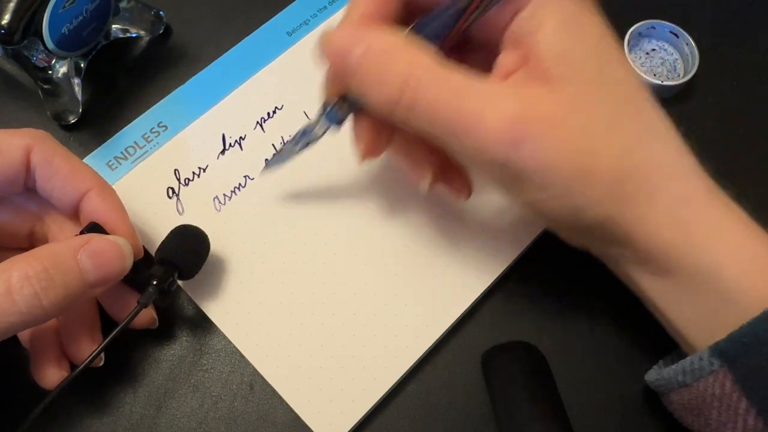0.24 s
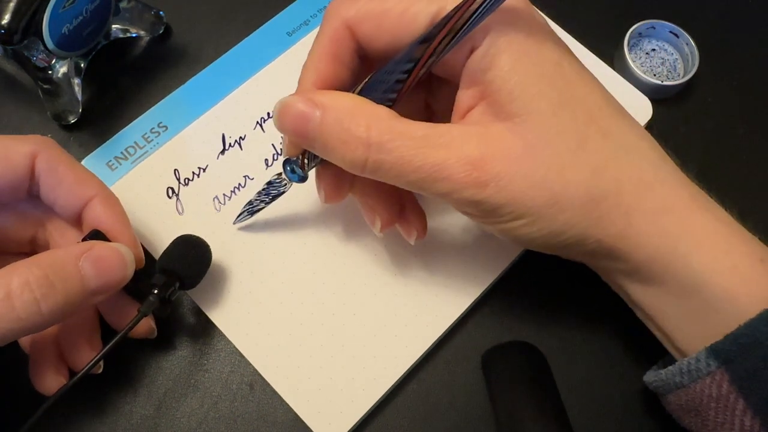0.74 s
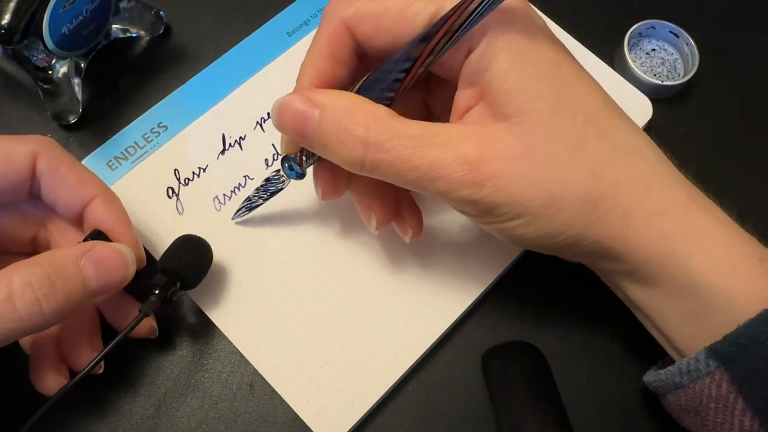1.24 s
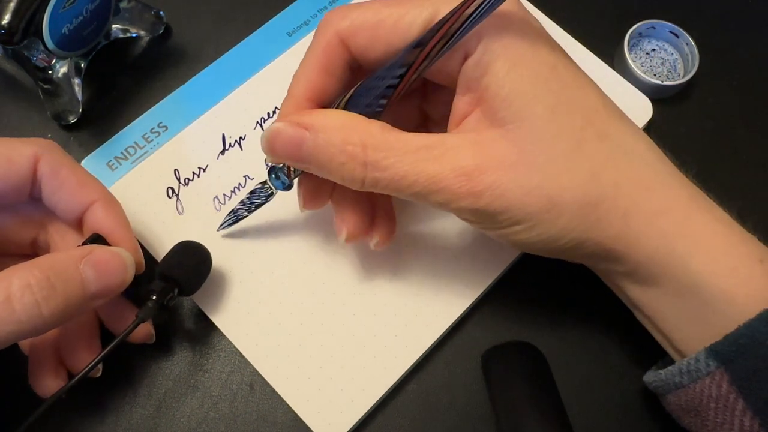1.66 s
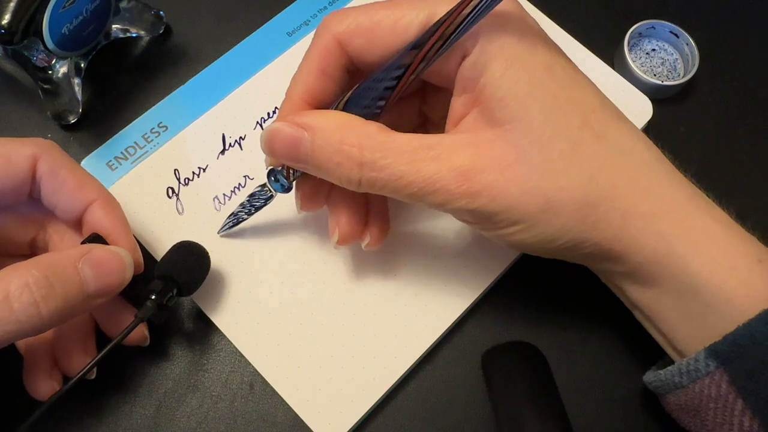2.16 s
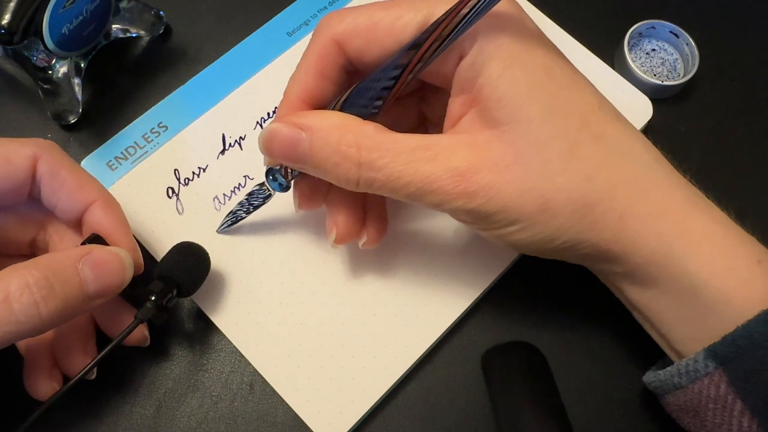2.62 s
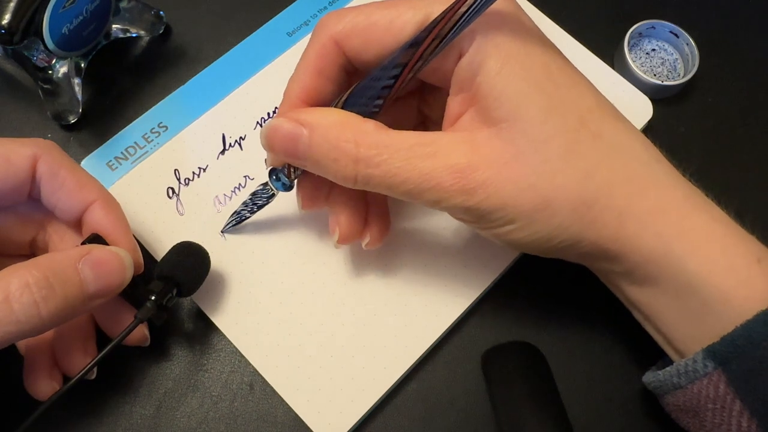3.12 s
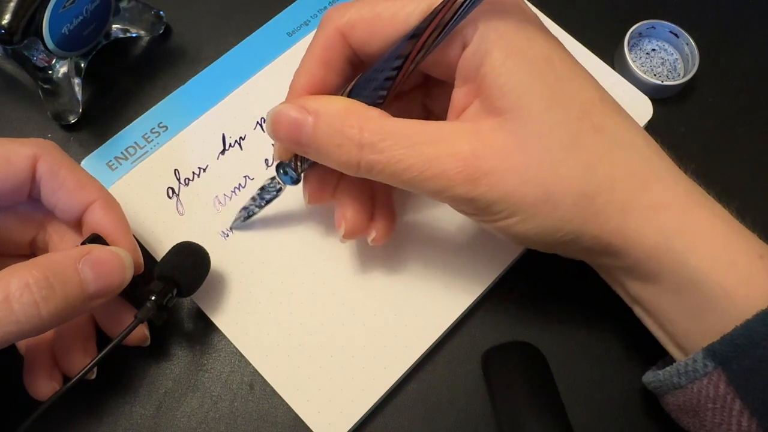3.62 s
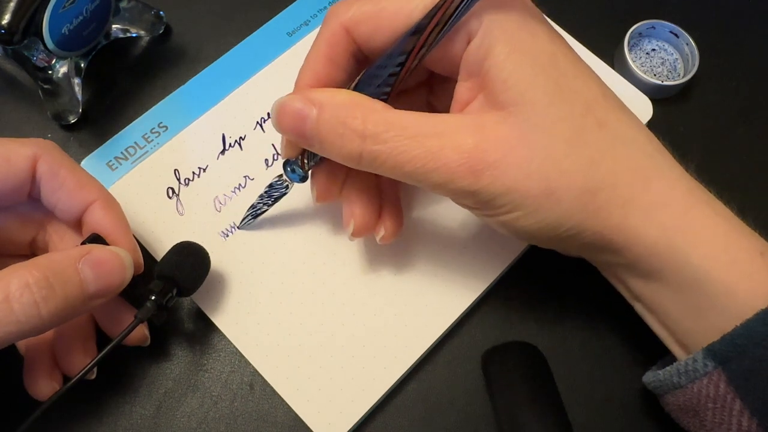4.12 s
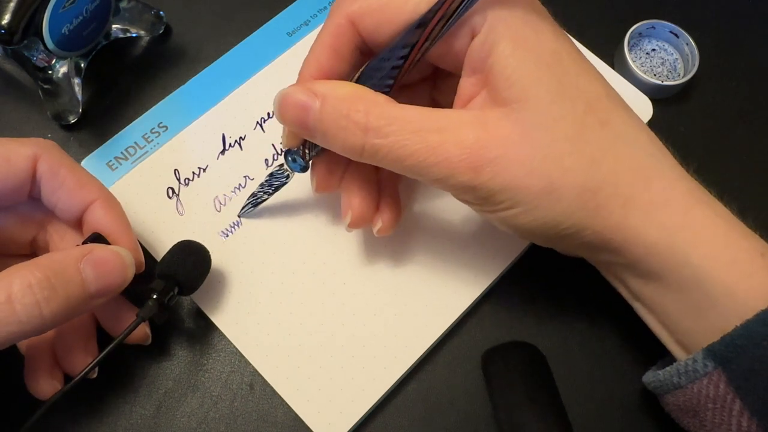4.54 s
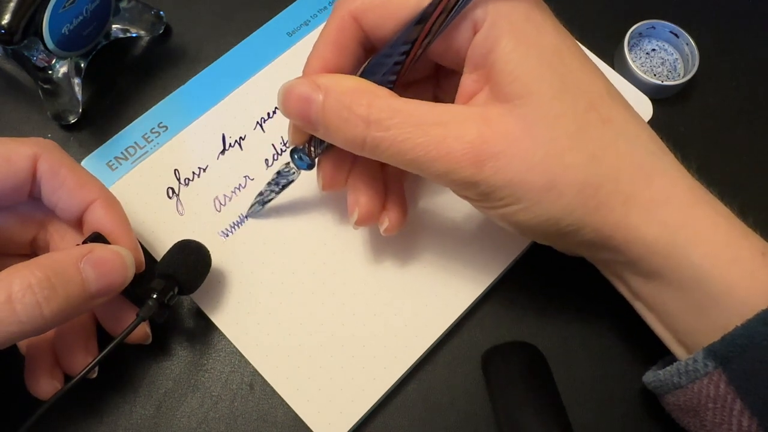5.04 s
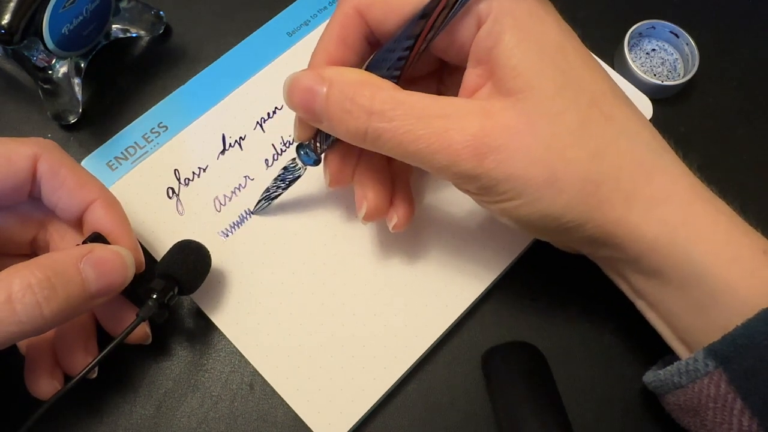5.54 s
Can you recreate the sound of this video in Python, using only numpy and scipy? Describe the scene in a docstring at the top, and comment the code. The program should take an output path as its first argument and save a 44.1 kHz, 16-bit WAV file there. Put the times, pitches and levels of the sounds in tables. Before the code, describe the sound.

Very close, dry sound from a small hand-held microphone in a quiet room with faint low ventilation hum. A tick and brief skin-on-paper hiss come first, with low bumps from shifting fingers. After a near-still pause and more bumps, a crisp tap leads into rapid alternating strokes of a glass nib, thin and scratchy with a bright ringing edge, lasting to the end.

```python
"""A glass pen scribbles quick back-and-forth strokes on a paper pad beside a small hand-held microphone.
The nib trips over paper fibres: these random snags ring the glass and its tip, and rasp the sheet and pad.
Before that, the writing hand slides over the sheet as shaped noise, and small filtered ticks are heard.
The microphone wobbles in the fingers as low noise, a wandering tone and pointed jolts.
Below lies a quiet room: coloured air noise and the narrow resonances of humming ventilation."""
import sys
import numpy as np
from scipy import signal
from scipy.fft import rfft, irfft
from scipy.io import wavfile
from scipy.ndimage import uniform_filter1d

SR = 44100
rng = np.random.default_rng(int(sys.argv[2]) if len(sys.argv) > 2 else 0)


def linear_from_db(decibels):
    """Turn decibels (scalar or array-like) into linear amplitude factors; 0 gives 1."""
    return 10 ** (np.asarray(decibels, float) / 20)


def bounce(signal):
    """Save signal as a 16-bit WAV file at the path given by the first command-line argument."""
    frames = np.transpose(np.atleast_2d(signal))
    limited = np.clip(frames, -1, 1)
    pcm = np.round(limited * 32767).astype(np.int16)
    wavfile.write(sys.argv[1], SR, pcm)


N = 254898

# Air noise of the room. Each row: frequency in Hz, relative level in dB per Hz.
AIR_SPECTRUM = [(50, -38), (85, -8), (130, 1.5), (160, -11.5), (190, -7), (320, -17), (700, -36),
                (900, -27), (1080, -29.5), (1600, -34.5), (2400, -37), (3200, -42), (6000, -44),
                (16000, -49.5)]
# Pitches of the ventilation duct. Each entry: frequency in Hz.
DUCT_PITCHES = [133, 405, 540, 608, 739, 803, 850, 1166, 1345]
# Duct resonances, in the order of the pitches. Each row: width in Hz, relative level in dB.
DUCT_MODES = [(25.2, 2.5), (28, 1.5), (29.9, 0.5), (29.5, 0), (24.6, -1.5), (18, 1), (35.4, -4.5),
              (30, -17), (45.3, -16)]
# Microphone wobbling in the fingers. Each row: time in seconds, gain of the sway in dB,
# gain of the shake in dB.
WOBBLE_PATH = [(0.0, -37, -39.5), (0.24, -22.5, -44.5), (0.36, -43.5, -45), (0.46, -23.5, -30.5),
               (0.7, -31, -46.5), (1.4, -40.5, -41), (1.62, -24, -32), (1.78, -21.5, -34),
               (1.92, -25.5, -45), (2.4, -36, -38.5), (3.4, -39, -38.5), (4.2, -33, -43.5),
               (5.09, -30.5, -41.5), (5.25, -41, -43), (5.78, -35.5, -39)]
# Jolts as the fingers shift on the microphone, before they are rounded off.
# Each row: time in seconds, peak in dB, rising and fading time constant in ms.
FINGER_JOLTS = [(0.229, -20.5, 1.5), (0.404, -28, 2.9), (0.468, -24.5, 2.3), (0.491, -23.5, 2.2),
                (0.503, -30, 2.1), (0.548, -23.5, 3.1), (1.516, -39, 2.3), (1.595, -22.5, 1.2),
                (1.622, -24.5, 1.6), (1.636, -42, 3.4), (1.665, -26, 4.3), (1.743, -25.5, 3.8)]
# Small ticks of nib, paper and fingers. Each row: time in seconds, peak in dB,
# lower and upper band edge in Hz.
SMALL_TICKS = [(0.1185, -24.5, 6960, 18000), (.555, -49.5, 3000, 6500), (1.523, -51, 4500, 12000),
               (1.556, -47, 4500, 12000), (1.668, -49, 3000, 5500), (1.697, -52, 3000, 6500),
               (1.717, -52, 1500, 3000), (1.774, -52, 4500, 12000), (2.010, -46.5, 5000, 10000),
               (2.6475, -28.5, 900, 18000), (2.6518, -41.5, 1300, 10000), (2.662, -45, 4000, 13000)]
# Hand sliding on the sheet. Each row: start at full speed in seconds, slide length in seconds,
# level early in dB, level late in dB.
HAND_SLIDES = [(0.149, 0.15, -49.5, -50), (0.43, 0.074, -66.5, -66), (1.483, 0.15, -70.5, -75.5)]
# Hiss of skin on paper. Each row: frequency in Hz, relative level in dB per Hz.
SKIN_SPECTRUM = [(1000, -5), (2000, -4), (3150, -8.5), (3700, -2), (4700, -10.5), (5050, -2.5), (5900, -4),
                 (7100, -9.5), (7700, -0.5), (11200, -1.5), (11900, -11), (12500, -1), (14500, -3),
                 (16000, -5)]
# Pen strokes. Each row: start at full speed in seconds, sweep length in seconds,
# scrape gain early in dB, scrape gain late in dB, extra gain in dB for glass bent lengthways.
PEN_STROKES = [(2.796, 0.076, -51, -61.5, -2), (2.957, 0.06, -54.5, -51.5, 1),
               (3.148, 0.026, -50, -54.5, -8), (3.305, 0.039, -50, -59, 6), (3.457, 0.047, -55, -57, -5),
               (3.586, 0.046, -55, -52, 6), (3.742, 0.049, -57, -58, -1), (3.897, 0.043, -54.5, -54.5, 7),
               (4.026, 0.054, -56.5, -58.5, -1), (4.178, .036, -54, -54.5, 5),
               (4.327, 0.053, -55.5, -62.5, 0), (4.465, 0.047, -52, -54.5, 0), (4.615, .04, -54.5, -60, 4),
               (4.74, 0.062, -55.5, -55, 6.5), (4.867, 0.06, -61, -53, 4), (5.014, 0.051, -54, -51.5, 7),
               (5.153, 0.052, -59.5, -54.5, 1), (5.3, 0.051, -54, -56.5, 10), (5.442, 0.036, -61, -57.5, 8),
               (5.596, 0.053, -53.5, -55.5, 8.5), (5.742, .035, -53.5, -55.5, 6)]
# Pitches of the bending glass. Each row: the modes of one direction in Hz, first sideways, then lengthways.
GLASS_PITCHES = [
    [3005, 5250, 7800],
    [4712, 12012],
]
# Glass modes, in the order of the pitches. Each mode: width in Hz, relative level in dB,
# change in dB per second as the pen tilts along the line.
GLASS_MODES = [
    [(62.6, 1, -1), (786, -16, -2.), (139, -6, -0.3)],
    [(60.3, -5, -0.1), (122, -5.5, -4.4)],
]
# Rasp of the sheet. Each row: frequency in Hz, relative level in dB per Hz.
PAPER_SPECTRUM = [(900, -13), (1400, 3.5), (2100, 11.5), (2600, 1.5), (4000, -6), (5200, -9.5),
                  (7000, -16.5), (9000, -18.5), (13500, -26), (16000, -32.5)]
# Low rumble of the pad below. Each row: frequency in Hz, relative level in dB per Hz.
PAD_SPECTRUM = [(80, -37), (150, -4), (300, -5), (550, -5.5), (800, -9.5), (1100, -12), (1400, -39)]


def set_rms(x, db):
    """Scale a sound to an rms level in dB."""
    return x * linear_from_db(db) / np.sqrt(np.mean(x ** 2))


def colour(x, points):
    """Shape a spectrum along (Hz, dB) points, on a logarithmic frequency scale."""
    hz, db = np.transpose(points)
    log_hz = np.log(np.fft.rfftfreq(N, 1 / SR) + 1e-9)  # the tiny offset avoids log(0)
    return irfft(rfft(x) * linear_from_db(np.interp(log_hz, np.log(hz), db)), N)


def resonance(x, hz, width_hz):
    """Ring at one frequency; the narrower the peak, the longer it rings."""
    return signal.lfilter(*signal.iirpeak(hz, hz / width_hz, SR), x)


def low_pass(x, hz):
    """Remove what lies above a frequency, with a gentle edge."""
    return signal.sosfilt(signal.butter(2, hz, fs=SR, output="sos"), x)


def band(lo_hz, hi_hz):
    """Noise between two steep edges, at an rms of 1."""
    sos = signal.butter(3, [lo_hz, hi_hz], "bandpass", fs=SR, output="sos")
    return set_rms(signal.sosfilt(sos, rng.standard_normal(N)), 0)


def walk(rate):
    """Random values with a spread near 1, `rate` of them per second, gliding from each to the next."""
    hold = int(SR / rate)
    steps = np.repeat(rng.standard_normal(N // hold + 1), hold)
    return uniform_filter1d(steps, hold)[:N]


def gain(rows):
    """Gain along (s, dB) rows, silent outside them, with corners smoothed over 5 ms."""
    s, db = np.transpose(rows)
    path_db = np.interp(np.arange(N) / SR, s, db, left=-200, right=-200)
    return uniform_filter1d(linear_from_db(path_db), SR // 200)


def swell(start_s, length_s, early_db, late_db, in_db_per_s, out_db_per_s, arch_db):
    """Gain of one movement: speeds up, sweeps in an arch from one level to another, slows down."""
    quiet_db = -95
    end_s = start_s + length_s
    return gain([(start_s - (early_db - quiet_db) / in_db_per_s, quiet_db),
                 (start_s, early_db),
                 # a sweep is fastest in its middle
                 (start_s + length_s / 2, (early_db + late_db) / 2 + arch_db),
                 (end_s, late_db),
                 (end_s + (late_db - quiet_db) / out_db_per_s, quiet_db)])


def fibres(spread_db, patchy_db, rate):
    """Dense tiny snags, some larger, in patches as the grip comes and goes."""
    size = np.minimum(rng.exponential(size=N), 5)
    snags = rng.standard_normal(N) * linear_from_db(spread_db * size)
    return set_rms(snags * linear_from_db(patchy_db * walk(rate)), 0)


def room():
    """Broad air noise and narrow duct resonances, nearly steady."""
    air = set_rms(colour(rng.standard_normal(N), AIR_SPECTRUM), -49.5)
    flow = rng.standard_normal(N)
    duct = np.zeros(N)
    for k, (hz, (width_hz, db)) in enumerate(zip(DUCT_PITCHES, DUCT_MODES)):
        duct += (-1) ** k * linear_from_db(db) * resonance(flow, hz, width_hz)  # alternating sign
    waver = linear_from_db(0.8 * walk(12))
    return (air + set_rms(duct, -52)) * waver


def wobble():
    """Finger tremor moves the capsule: a slow sway, a faster shake and single pointed jolts."""
    rows, t = np.array(WOBBLE_PATH), np.arange(N) / SR
    sway = band(3.5, 19) * gain(rows[:, [0, 1]])
    # the shake is an oscillation whose pace wanders around 33 Hz, with a rougher fringe
    pace_hz = 33 + 6.03 * walk(12)
    shake = np.sin(2 * np.pi * np.cumsum(pace_hz) / SR) + linear_from_db(-7) * band(21, 54)
    waver = linear_from_db(2.5 * walk(4.49))
    shake = shake * gain(rows[:, [0, 2]]) * waver
    jolts = sum(linear_from_db(db) * np.exp(-1000 * abs(t - s) / ms) for s, db, ms in FINGER_JOLTS)
    return sway + shake + low_pass(jolts, 260)


def ticks():
    """Each tick is a sharp crack with a short rustle, in its own band."""
    t60_s = 0.0052  # time for the rustle to fade by 60 dB
    out, t = np.zeros(N), np.arange(400) / SR
    for s, db, lo_hz, hi_hz in SMALL_TICKS:
        rustle = rng.standard_normal(len(t)) * np.exp(-np.log(1000) * t / t60_s)
        crack = (t == 0) + 0.12 * rustle
        sos = signal.butter(2, [lo_hz, hi_hz], "bandpass", fs=SR, output="sos")
        tick = signal.sosfilt(sos, crack)
        i = int(s * SR)
        out[i:i + len(t)] += tick * linear_from_db(db) / abs(tick).max()
    return out


def hand():
    """Skin hisses smoothly over the sheet."""
    rub = fibres(spread_db=0.5, patchy_db=1.64, rate=150)
    hiss = set_rms(colour(rub, SKIN_SPECTRUM), 0)
    moves = sum(swell(*row, in_db_per_s=500, out_db_per_s=700, arch_db=3) for row in HAND_SLIDES)
    return hiss * moves


def pen():
    """One stream of snags drives the glass, its tip, the sheet and the pad below."""
    # strokes alternate; pairs hold the outward and the return stroke
    speed_up_db_per_s, slow_down_db_per_s = (460, 752), (602, 802)
    sideways_db, tip_db = (2.5, 0), (6.5, 5.5)
    firm_db = -54  # scrape gain of a firm stroke
    rows = np.array(PEN_STROKES)
    way = np.arange(len(rows)) % 2
    moves = np.array([swell(*row[:4], speed_up_db_per_s[w], slow_down_db_per_s[w], arch_db=1)
                      for row, w in zip(rows, way)])
    motion = moves.sum(0)
    since_s = np.arange(N) / SR - rows[0, 0]  # time since the first stroke
    snags = fibres(spread_db=2.5, patchy_db=2, rate=250)
    snags = snags * linear_from_db(0.8 * walk(60))  # the nib sticks and slips in bursts

    # slow, light contact still rings the glass but hardly rasps the sheet
    sheet = set_rms(colour(snags, PAPER_SPECTRUM), -3.5) * motion * (motion / linear_from_db(firm_db)) ** 0.46

    glass = np.zeros(N)
    bend_db = np.take(sideways_db, way), rows[:, 4]  # sideways, lengthways
    for direction_db, pitches, modes in zip(bend_db, GLASS_PITCHES, GLASS_MODES):
        # the glass rings on after the snags, so the motion shapes the drive
        drive = snags * (linear_from_db(direction_db) @ moves)
        for hz, (width_hz, db, tilt_db_per_s) in zip(pitches, modes):
            # each mode is caught unevenly as the ridged nib rocks
            catch = linear_from_db(tilt_db_per_s * since_s + 2.5 * walk(30))
            glass += linear_from_db(db) * resonance(drive * catch, hz, width_hz)

    # the tip squeak fades along the line
    stroke_tip_db = np.take(tip_db, way) - 2.5 * (rows[:, 0] - rows[0, 0])
    tip = set_rms(resonance(snags, 15650, 200), -11.5) * (linear_from_db(stroke_tip_db) @ moves)

    push = snags * linear_from_db(1.5) * motion  # the nib pushes into the pad
    pad = colour(push, PAD_SPECTRUM) / np.std(colour(snags, PAD_SPECTRUM)) * linear_from_db(6.5)
    # the pad sounds deeper as the nib moves along it
    pad = pad + low_pass(pad, 440) * linear_from_db(-8 + 3 * since_s)
    return sheet + linear_from_db(12.5) * glass + tip + pad


def scene():
    """All sources, heard by one capsule."""
    return (room() + wobble() + ticks() + hand() + pen())[None]


def top_cut(x):
    """Nothing passes above the cut-off."""
    return signal.sosfilt(signal.butter(12, 16660, fs=SR, output="sos"), x)


def record(dry):
    """A very steep low-pass filter cuts off the top above 15770 Hz."""
    sos = signal.ellip(12, 0.3, 60, 15770, fs=SR, output="sos")
    mix = signal.sosfilt(sos, dry)
    return top_cut(mix)


dry = scene()
out = record(dry)
bounce(out)
```